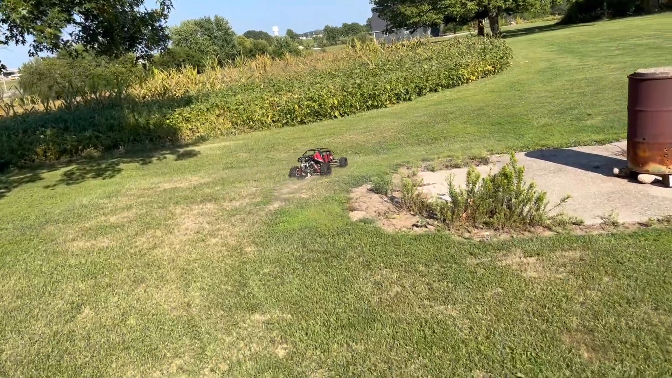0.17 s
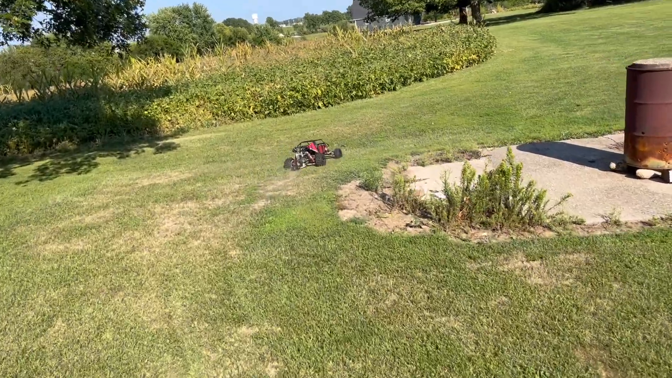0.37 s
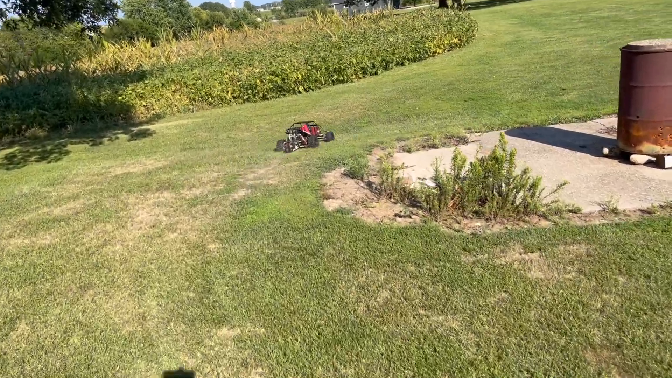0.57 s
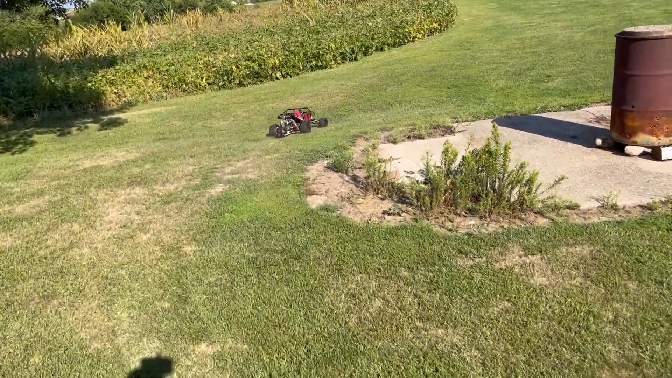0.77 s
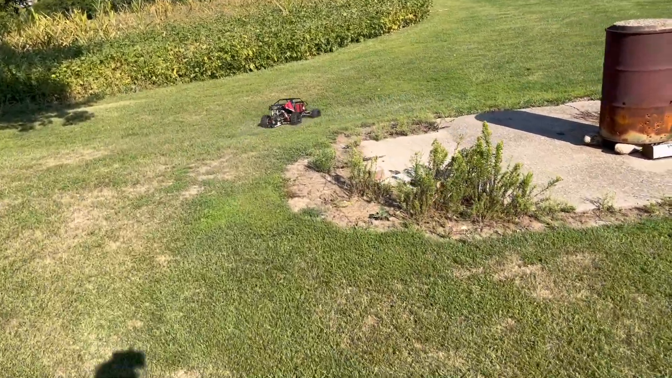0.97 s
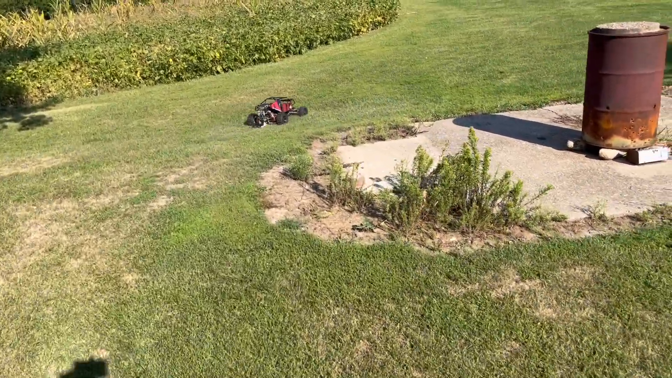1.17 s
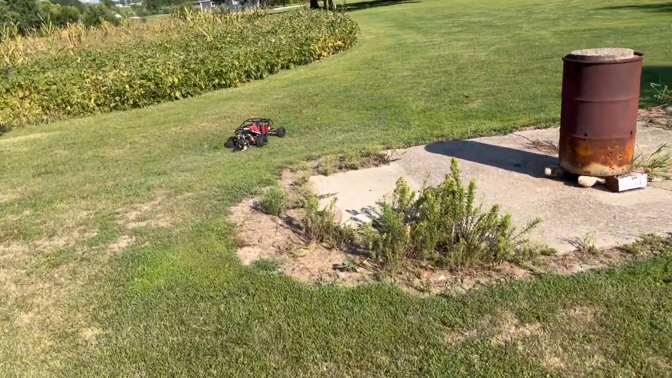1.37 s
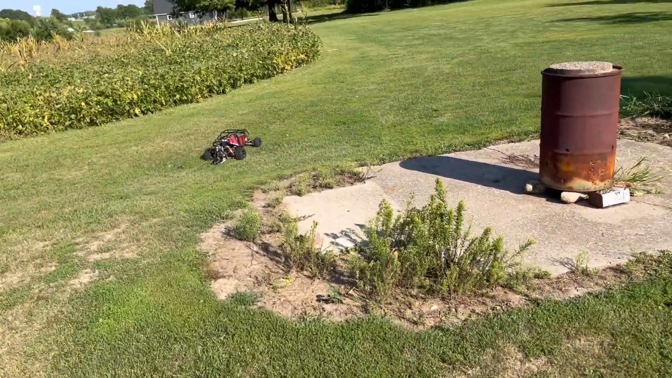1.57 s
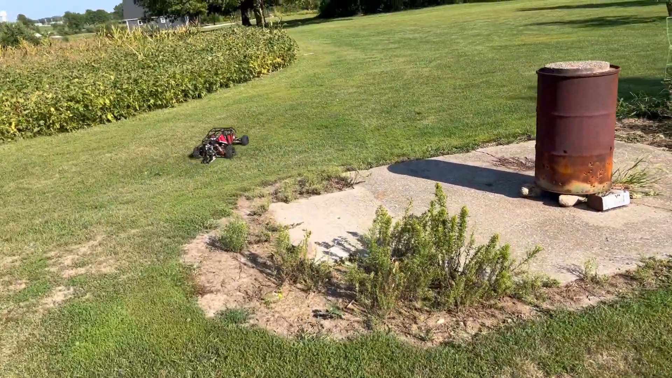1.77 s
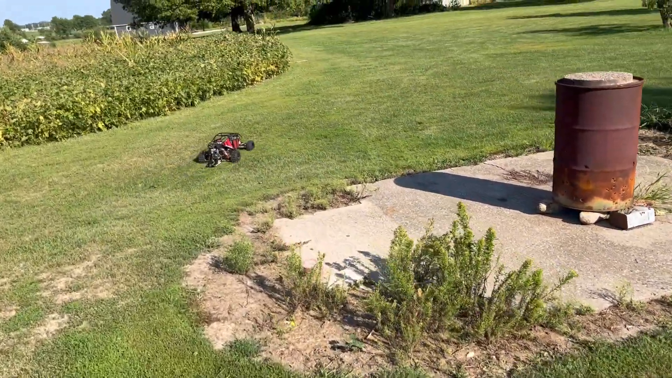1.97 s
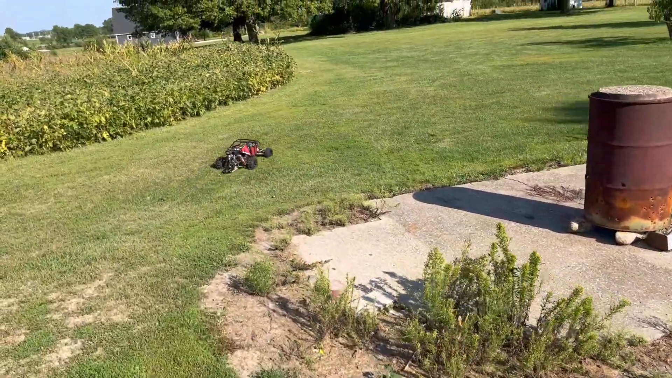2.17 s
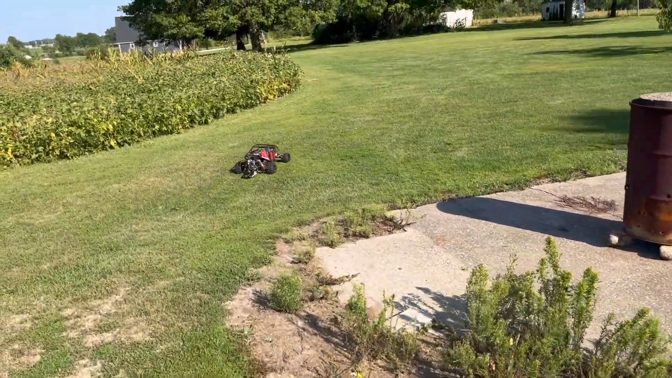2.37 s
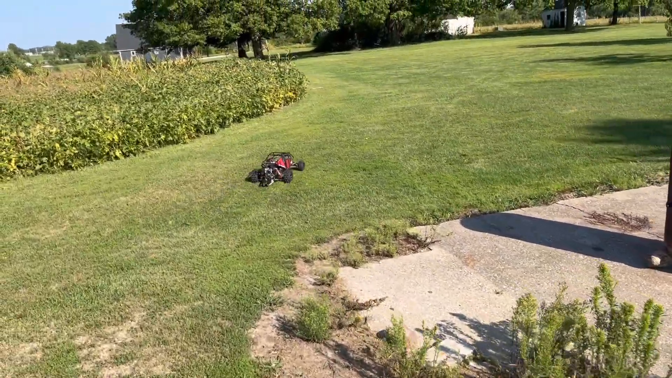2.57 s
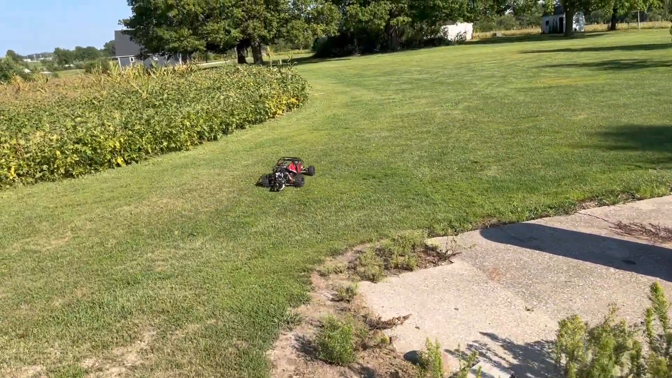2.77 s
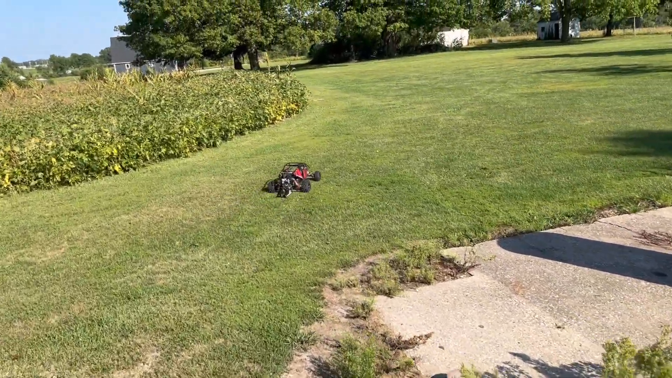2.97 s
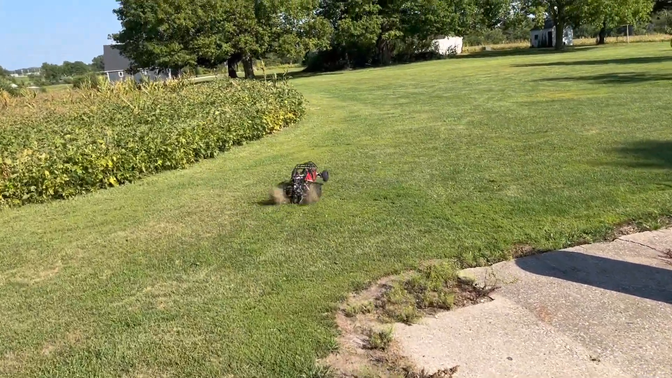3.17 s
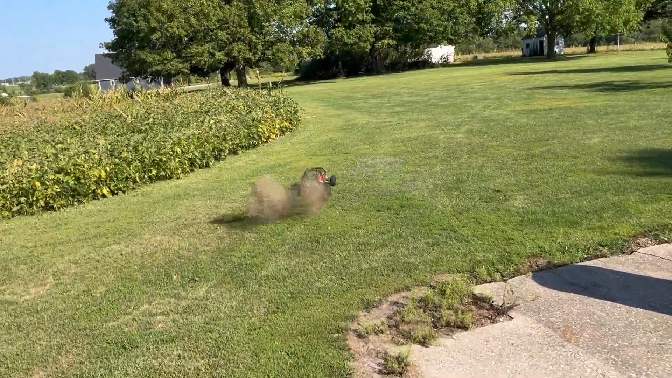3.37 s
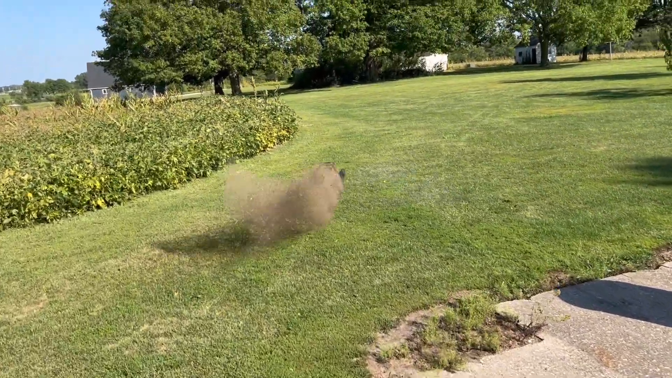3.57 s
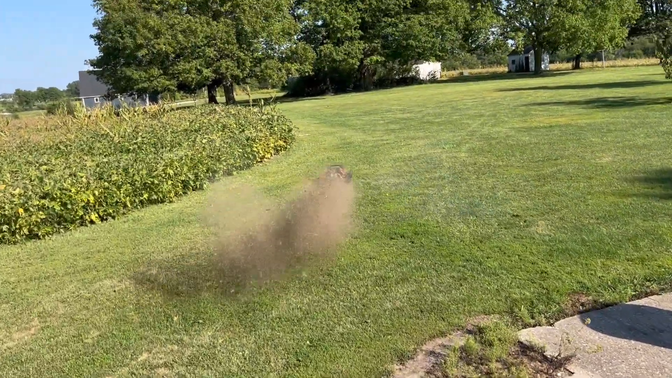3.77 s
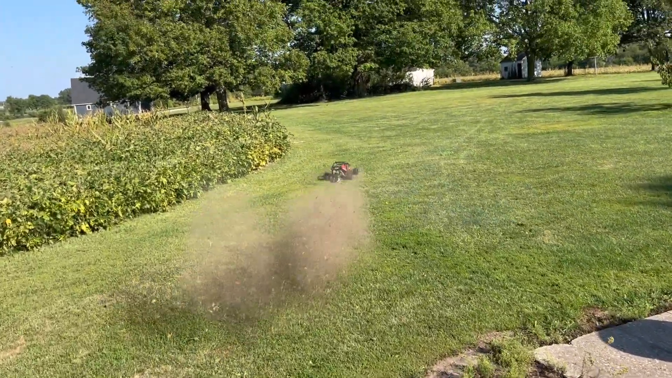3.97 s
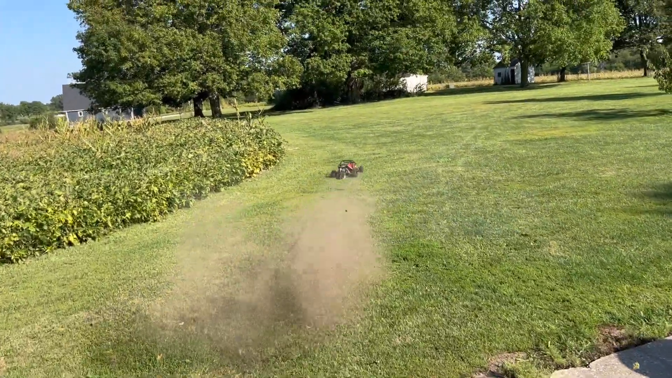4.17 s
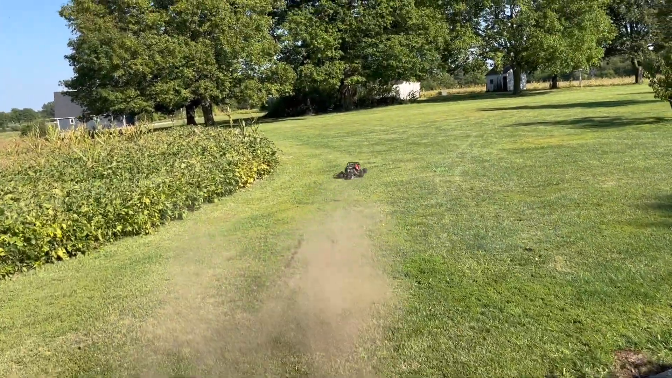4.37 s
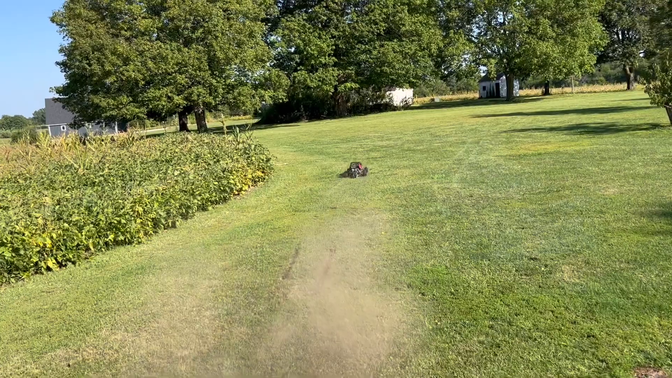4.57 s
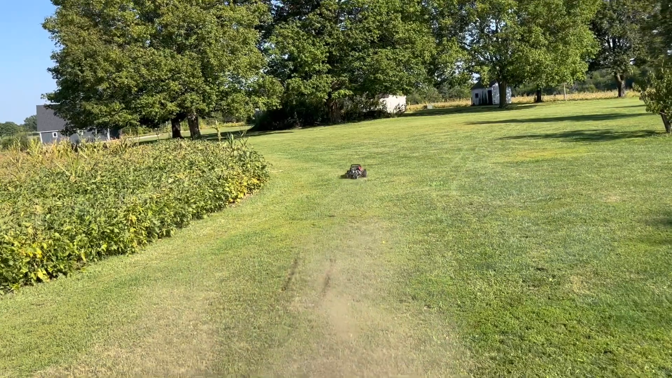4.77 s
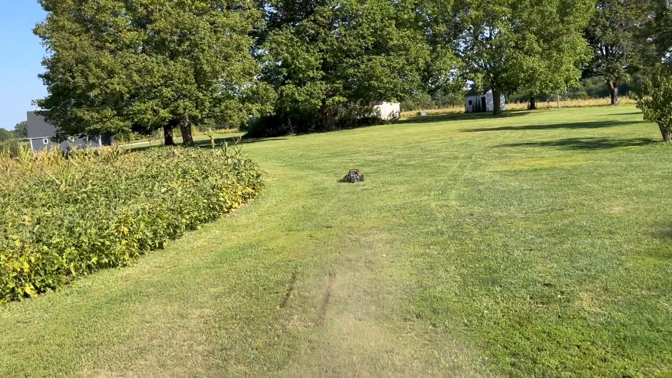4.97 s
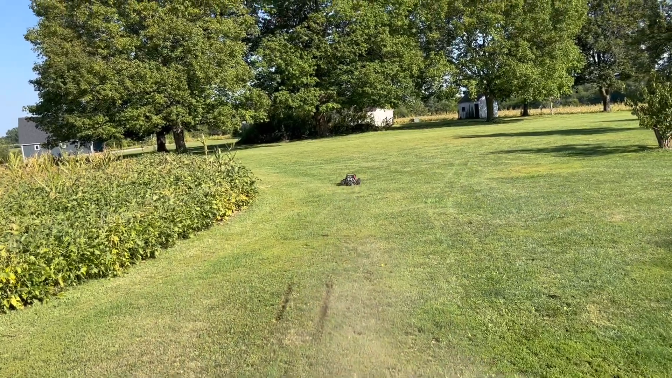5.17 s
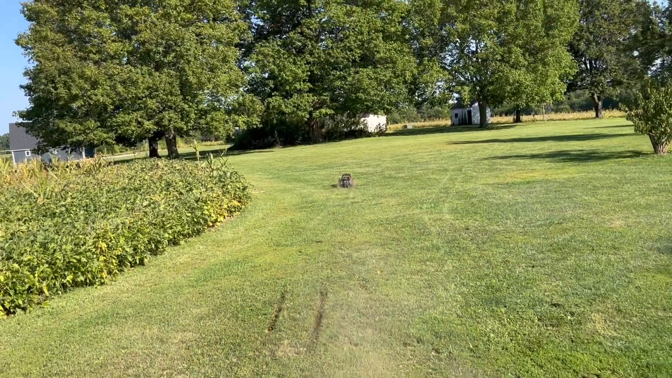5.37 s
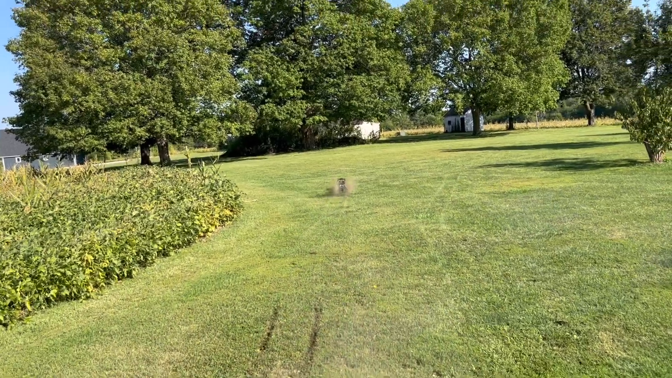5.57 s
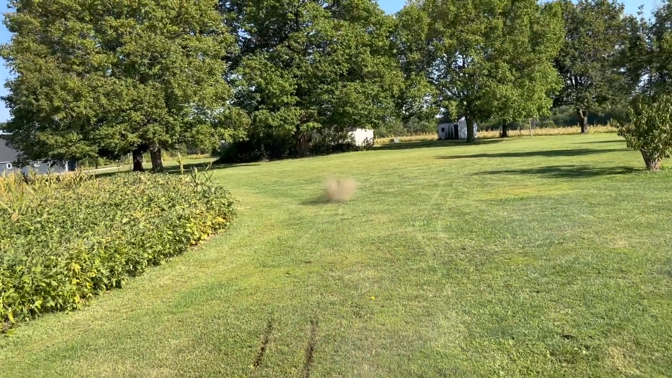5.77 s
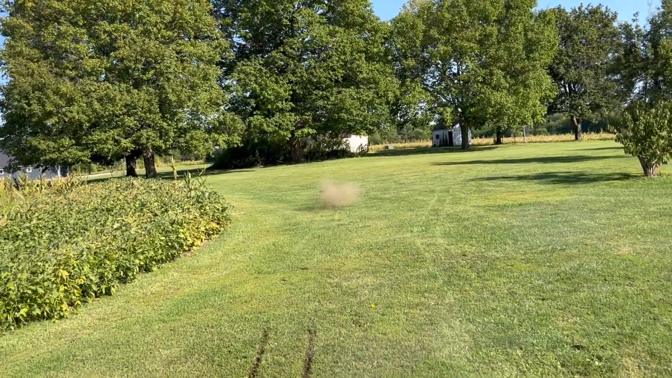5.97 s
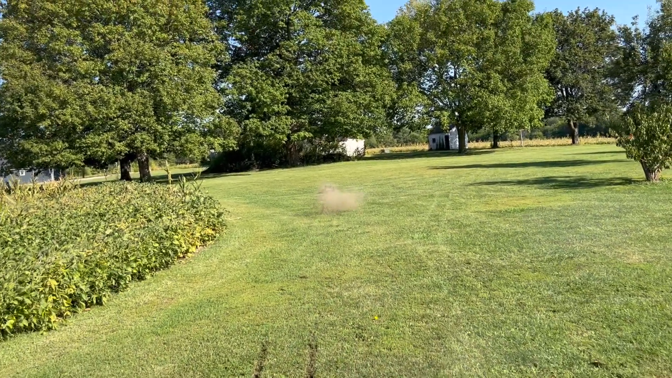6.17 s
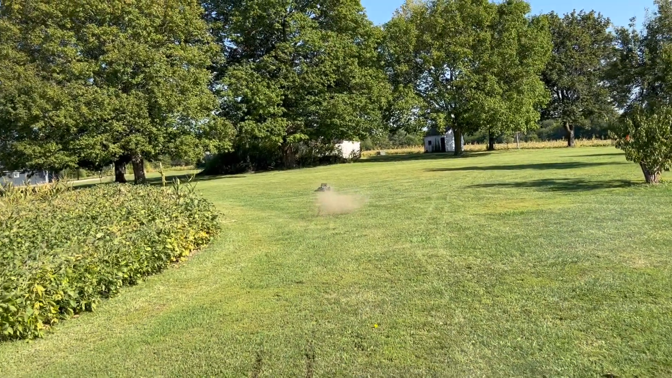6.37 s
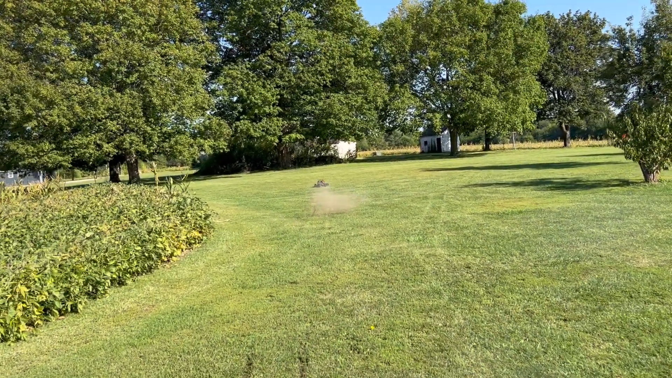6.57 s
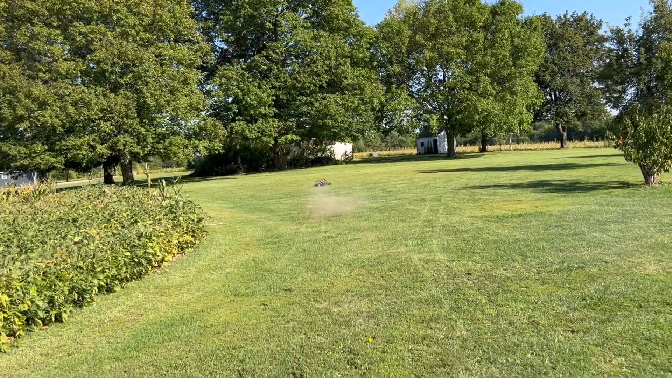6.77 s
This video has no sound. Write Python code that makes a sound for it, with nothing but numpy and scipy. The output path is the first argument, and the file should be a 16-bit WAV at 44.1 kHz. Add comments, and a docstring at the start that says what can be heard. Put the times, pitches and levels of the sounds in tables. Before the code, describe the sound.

Outdoors on an open lawn, a small two-stroke model buggy gives five sharp, uneven throttle blips, each falling back into rattling, popping coasting. It then tears off in a loud ragged burst with wheels slipping, coasts down, blips briefly and bursts again farther off, finally sputtering lower. Trees and crops return dull echoes. A handheld stereo microphone stays put, with faint wind, leaves and insects beneath.

```python
"""A small two-stroke model buggy on a lawn: light wind, leaves and insects lie under the whole scene.
Five short throttle blips come first, heard mostly side-on: each firing is a crack, a gas puff and a low thump.
At 2.9 s it spins its wheels away in a long burst, tail-on; a short blip at 4.7 s leads to a second at 5.2 s.
Whenever the throttle shuts, drag slows the crank: the engine pumps air and rattles, with stray firings.
Trees and crops answer as scattered, duller echoes, and it winds down to the end."""
import sys
import numpy as np
from scipy import signal
from scipy.fft import rfft, irfft, next_fast_len
from scipy.io import wavfile
from scipy.ndimage import uniform_filter1d, map_coordinates

SR = 44100
rng = np.random.default_rng(int(sys.argv[2]) if len(sys.argv) > 2 else 0)


def waveform_to_disk(signal):
    """Save audio, clipped to [-1, 1], as 16-bit WAV at the path in sys.argv[1]."""
    frames = np.transpose(np.atleast_2d(signal))
    scaled = np.clip(frames, -1, 1) * 32767
    samples = np.round(scaled).astype(np.int16)
    wavfile.write(sys.argv[1], SR, samples)


N = 301196

# waves running back along the tuned pipe: (delay/s, level/dB)
PIPE_WAVES = [(.0012, -10), (.0024, -13), (.0035, -15), (.0085, -21)]
RATTLE_DB_PER_OCTAVE = 19.5  # growth with crank speed
FLUTTER_DB, FLUTTER_RATE = 2.5, 12  # throttle shut, cracks and rattle swell and sink: depth, changes a second
LEAD_S, EARLY_S = .02, .012  # the crank picks up before steady firing and tops out before the end


def amp(db):
    """Decibels to amplitude."""
    return 10 ** (np.asarray(db) / 20)


def unit(x):
    """Scales to an RMS of one."""
    return x / np.sqrt(np.mean(x ** 2) + 1e-20)


def along(points, hz):
    """Reads (f/Hz, value) points on a log frequency axis."""
    f, v = np.transpose(points)
    return np.interp(np.log(hz + 1), np.log(f + 1), v)


def curves(rows, t):
    """Each column after the time, read at times t."""
    s, *cols = np.transpose(rows)
    return [np.interp(t, s, c) for c in cols]


def wobble(rate):
    """A smooth random curve, rate knots a second."""
    knots = rng.standard_normal(int(N * rate / SR) + 4)
    return map_coordinates(knots, [np.arange(N) * rate / SR])


def filtered(x, response):
    """Applies a complex response of frequency to x."""
    m = next_fast_len(N + SR // 2)
    return irfft(rfft(x, m) * response(np.fft.rfftfreq(m, 1 / SR)), m)[..., :N]


def coloured(x, spectrum):
    """Minimum-phase colouring that keeps the energy of a pulse or of white noise."""
    size = 4096
    gain_db = np.maximum(along(spectrum, np.fft.rfftfreq(size, 1 / SR)), -70)
    # fold the cepstrum forward in time, so nothing sounds ahead of its pulse
    cepstrum = irfft(np.log(amp(gain_db)))
    cepstrum[1:size // 2] *= 2
    cepstrum[size // 2 + 1:] = 0
    shape = irfft(np.exp(rfft(cepstrum)))
    shape = shape[None] / np.linalg.norm(shape)
    return signal.fftconvolve(np.atleast_2d(x), shape, axes=1)[:, :N]


def pulses(times, sizes):
    """Windowed-sinc pulses that may fall between samples."""
    at = np.asarray(times)[:, None] * SR
    k = np.floor(at) + np.arange(-7, 9)
    w = np.sinc(k - at) * np.cos(np.pi * (k - at) / 16) ** 2
    slots = np.clip(k, 0, N).astype(int).ravel()
    return np.bincount(slots, (w * sizes[:, None]).ravel(), N + 1)[:N]


def ring(x, centre_hz, width_hz, db):
    """Lifts or cuts one resonance."""
    def response(f):
        band = 1j * f * width_hz
        return 1 + (amp(db) - 1) * band / (centre_hz ** 2 - f * f + band)
    return filtered(x, response)


def sliding(x, centre_hz, width_hz, db, count=9):
    """A resonance that moves: each moment is shared between the two nearest of a row of fixed ones."""
    row = np.linspace(centre_hz.min(), centre_hz.max(), count)
    place = np.interp(centre_hz, row, np.arange(count))
    share = lambda k: np.clip(1 - np.abs(place - k), 0, 1)
    return sum(ring(x * share(k), c, width_hz, db) for k, c in enumerate(row))


def openings():
    """Throttle openings: first and last firing s, rows (t/s, crank/Hz, crack/dB, thump/dB), facing, rattle dB, pumping dB."""
    # short throttle blips: (open t/s, shut t/s, crank at opening f/Hz, crank at top f/Hz, first crack level/dB,
    # last crack level/dB, thump level/dB, pipe facing the listener/0-1, coasting rattle level/dB, pumping level/dB)
    blips = [ (0.028, 0.123, 97.34, 170.2, -26, -25, -26.5, 0.04, -56.5, -39),
             (0.471, 0.564, 97.18, 193.3, -24.5, -25, -25, 0.09, -60, -40),
             (1.124, 1.192, 75.08, 144.9, -30.5, -28, -27, 0.1, -56.5, -38),
             (1.626, 1.744, 87.17, 178.6, -21, -20.5, -25, 0.08, -53.5, -39.5),
             (2.35, 2.459, 73.72, 168.8, -22, -21, -26.5, 0.21, -52.5, -40),
             (4.68, 4.783, 37.98, 156.6, -41.5, -27, -35.5, 0.98, -57.5, -48), ]
    # long bursts, wheels slipping and gripping: (t/s, crank f/Hz, crack level/dB, thump level/dB)
    bursts = [
        [(2.902, 87.3, -23, -31.5), (2.982, 165.7, -21.5, -28.5), (3.034, 202, -20, -30),
         (3.078, 210.4, -19, -30.5), (3.162, 206.8, -19.5, -31.5), (3.238, 191.7, -21.5, -35),
         (3.272, 220.9, -19, -30.5), (3.298, 235.6, -22, -35), (3.326, 229.4, -21.5, -30.5),
         (3.358, 205.2, -21.5, -35), (3.386, 194.3, -21.5, -31.5), (3.436, 208.4, -21, -32),
         (3.466, 189.5, -22, -33.5), (3.548, 188.1, -27, -34.5)],
        [(5.165, 90.9, -34.5, -40.5), (5.246, 163.5, -24, -34.5), (5.328, 198, -24.5, -34),
         (5.368, 200.7, -21, -34), (5.474, 191, -24, -36), (5.532, 230.7, -22.5, -33.5),
         (5.604, 226, -23, -34.5), (5.644, 204.3, -23.5, -36), (5.68, 198.4, -25, -36.5),
         (5.716, 199.2, -22.5, -35.5), (5.782, 219.3, -24.5, -37)],
    ]
    # coasting after each burst: (rattle level/dB, pumping level/dB)
    burst_ends = [(-66, -50.5), (-58, -52.5)]
    bend, thump_swell = .9, .91  # curve of the rise in speed; the thump's share of the crack's swell
    out = [(b[0][0] + LEAD_S, b[-1][0] + EARLY_S, np.array(b), 1, *end) for b, end in zip(bursts, burst_ends)]
    u = np.linspace(0, 1, 12)
    for start, shut, low_hz, top_hz, first_db, last_db, thump_db, *end in blips:
        s = start - LEAD_S + u * (shut - EARLY_S - start + LEAD_S)
        hz = low_hz + (top_hz - low_hz) * u ** bend
        swell_db = (first_db - last_db) * (1 - u)
        rows = [s, hz, last_db + swell_db, thump_db + thump_swell * swell_db]
        out.append((start, shut, np.transpose(rows), *end))
    return sorted(out, key=lambda o: o[0])


def speed():
    """Crank turns a second: driven while open, then slowed by drag down to the speed of the next opening."""
    # throttle shut: (crank f/Hz, loss of speed/turns per s each s)
    drag = [(35, 18), (45, 47), (70, 105), (100, 135), (145, 290), (180, 800), (240, 1300)]
    last_hz = 37.84  # as the scene ends
    hz = np.linspace(250, 30, 221)
    lapse = np.cumsum(1 / along(drag, hz))  # relative time taken to slow down this far
    driven = [o[2][:, :2] for o in openings()] + [np.array([[N / SR, last_hz]])]
    u = np.linspace(0, 1, 60)[1:-1]
    rows = []
    for now, then in zip(driven, driven[1:]):
        a, b = np.interp([-now[-1, 1], -then[0, 1]], -hz, lapse)
        coast_s = now[-1, 0] + u * (then[0, 0] - now[-1, 0])
        coast_hz = np.interp(a + u * (b - a), lapse, hz)
        rows += [now, np.transpose([coast_s, coast_hz])]
    path = np.vstack(rows + driven[-1:])
    return uniform_filter1d(curves(path, np.arange(N) / SR)[0], size=1000)  # the flywheel rounds the corners


def crank(hz):
    """Crank angle in turns; the first firing of an opening falls on a whole turn."""
    t = np.arange(N) / SR
    turns = np.cumsum(hz) / SR
    starts = [o[0] for o in openings()]
    at = np.interp(starts, t, turns)
    return turns + np.interp(t, starts, np.round(at) - at + 1e-6)


def coasting(column):
    """An openings() column over time: reached while an opening fires, then held until the next one."""
    each = openings()
    value = np.repeat([o[column] for o in each], 2)
    return np.interp(np.arange(N) / SR, np.ravel([o[:2] for o in each]), np.r_[value[0], value[:-1]])


def coasting_rattle_db(hz):
    """Coasting rattle level: it grows with crank speed and flutters."""
    return coasting(column=4) + RATTLE_DB_PER_OCTAVE * np.log2(hz / 100) + FLUTTER_DB * wobble(FLUTTER_RATE)


def outdoors():
    """Far rustle of leaves, thin insect songs and wind lumps on the ports, all from shaped noise."""
    # leaf rustle: (f/Hz, level/dB)
    field = [(350, -34.5), (600, 5.5), (863, -5.5), (1180, -5.5), (4590, -15), (8520, -23.5), (10600, -23),
             (14500, -37), (16000, -68)]
    # insect songs: (f/Hz, width/Hz, level before swelling/dB)
    insects = [(9150, 130, -80), (10400, 160, -80), (11600, 150, -86)]
    # colour of the wind lumps: (f/Hz, level/dB)
    buffet = [(20, -30), (40, -4), (60, 0), (100, -5), (160, -18), (300, -45)]
    # strength of the wind lumps: (t/s, level/dB)
    wind = [(0, -30.5), (.3, -72), (1, -46), (1.8, -41), (2.5, -43.5), (3.48, -43.5), (4.03, -65.5),
            (4.2, -53), (6.1, -66), (6.3, -52.5)]
    field_db, gust_db = -58, 2

    def pair(apart):  # shared noise plus some of each port's own
        return rng.standard_normal(N) + apart * rng.standard_normal((2, N))

    def song(centre_hz, width_hz):
        return unit(filtered(pair(1.0), lambda f: np.exp(-((f - centre_hz) / width_hz) ** 2)))

    leaves = amp(field_db + gust_db * wobble(3.035)) * coloured(pair(0.54), field)
    bugs = sum(amp(db + 6 * wobble(3)) * song(c, w) for c, w, db in insects)
    lumps = unit(amp(3 * wobble(12)) * coloured(pair(.2), buffet))
    return leaves + bugs + amp(curves(wind, np.arange(N) / SR)[0]) * lumps


def pumping(turns, hz):
    """With no firing the port still puffs once a turn; the faster the crank, the sharper the puff."""
    # colour of the sharp puff: (f/Hz, level/dB)
    sharp_spectrum = [(35, -111), (70, 27), (130, 21), (270, 19), (550, 16.5), (680, 28), (790, 10),
                      (910, 27.5), (1200, -8), (1600, 14.5), (2800, 22), (4000, -17)]
    # colour of the soft puff near idle: (f/Hz, level/dB)
    soft_spectrum = [(40, -36), (90, -18), (160, 4.5), (300, 3), (480, 2.5), (900, -21), (1500, -22)]
    # pumping gain: (crank f/Hz, level/dB)
    gain_by_speed = [(40, -2), (65, -1.5), (95, 2), (150, 4.5)]
    # crank speeds between which the puff turns soft: (still sharp f/Hz, all soft f/Hz)
    sharp_hz, soft_hz = (78.6, 50)
    slump_s, slump_hz = .012, 250  # the soft puff falls in pitch: lag of its lowest part, scale of the shrinking lag
    t = np.arange(N) / SR
    # a pulse train whose order k weighs r ** k
    r = np.clip(0.768 + 0.0021 * hz, 0, .96)
    train = (1 - r * r) / (1 - 2 * r * np.cos(2 * np.pi * turns) + r * r)
    puffs = (train - 1) * np.sqrt(1 - r * r)
    shut = 1 - sum((t > o[0]) & (t < o[1]) for o in openings())
    level = amp(coasting(column=5) + along(gain_by_speed, hz))
    soft = np.clip((hz - sharp_hz) / (soft_hz - sharp_hz), 0, 1)
    uneven = amp(4 * wobble(45))
    breathy = puffs * uneven + rng.standard_normal(N)  # half lost in turbulent gas
    slump = lambda f: np.exp(-2j * np.pi * slump_s * slump_hz * (1 - np.exp(-f / slump_hz)))
    putts = filtered(coloured(breathy, soft_spectrum), slump)
    puffed = unit(coloured(puffs, sharp_spectrum)) * np.sqrt(1 - soft) + unit(putts) * np.sqrt(soft)
    return level * uniform_filter1d(shut * 1., size=200) * puffed


def rattle(turns, hz):
    """Clutch, gears and intake: spiky noise that swells once a turn, shaken harder by firing."""
    # rattle colour: (f/Hz, level/dB)
    spectrum = [(300, -21), (800, -0.5), (1700, -10.5), (3800, 3.5), (5400, -27), (10000, -18),
                (14000, -29), (16500, -79)]
    gate, spike_db = 0.067, 5  # depth of the swell; spikiness of the grains
    offset_db = -10  # against the coasting rattle level
    shake_db, shake_t60_s = -14, .35  # firing shakes the parts up to this against the crack, then they settle
    hidden_db = -5  # tail-on, the body hides the shaking parts
    t = np.arange(N) / SR
    swell = 1 + gate * np.cos(2 * np.pi * turns)
    grains = rng.standard_normal(N) * amp(spike_db * wobble(1500)) * swell * amp(0.88 * wobble(5.4))
    level = amp(offset_db + coasting_rattle_db(hz))
    for start, shut, rows, facing, *_ in openings():
        settle_db = -60 * np.maximum(t - shut, 0) / shake_t60_s
        build = np.clip((t - start) / (shut - start), 0, 1)
        level += amp(rows[-1, 2] + shake_db + hidden_db * facing + settle_db) * build
    return level * coloured(unit(grains), spectrum)


def firings(turns, hz):
    """One firing a turn: full cracks and thumps while open, faint cracks while shut."""
    weak_db, weak_scatter_db = 4.5, 1.5  # faint cracks, against the coasting rattle level
    fade_hz, fade_db = 85, 14  # they fade under this speed, by this much an octave
    cut_s, cut_db = .021, -3  # the thump sinks over the last turns
    scatter_db, uneven_db = -0.67, 1.8  # size scatter tail-on; added side-on, where the blips fire unevenly
    misfire_s = 1.732  # one turn fails to light
    t = np.arange(N) / SR
    when = np.interp(np.arange(np.ceil(turns[0]), turns[-1]), turns, t)
    chance = rng.standard_normal((len(when), 2))
    hz_then = np.interp(when, t, hz)
    size = np.sqrt(SR / hz_then)  # a pulse carries one turn's energy
    crack = amp(np.interp(when, t, coasting_rattle_db(hz)) + weak_db + weak_scatter_db * chance[:, 1])
    crack *= amp(fade_db * np.minimum(np.log2(hz_then / fade_hz), 0))
    rear = np.interp(when, t, np.clip(coasting(column=3), 0, 1))
    thump, shut_db = np.zeros(len(when)), np.zeros(len(when))
    for start, shut, rows, facing, *_ in openings():
        on = (when > start - .001) & (when < shut)
        _, crack_db, thump_db = curves(rows, when[on])
        thump_db += cut_db * np.clip(1 - (shut - when[on]) / cut_s, 0, 1)
        crack[on], thump[on], rear[on] = amp(crack_db), amp(thump_db), np.clip(facing, 0, 1)
        shut_db[on] = -np.inf
    crack *= amp((scatter_db + uneven_db * (1 - rear)) * chance[:, 0])
    crack[np.argmin(np.abs(when - misfire_s))] = 0
    return when, size, crack, thump, rear, shut_db


def stray_firings():
    """Single stray firings: times, sizes and how far each is heard tail-on."""
    # stray firings: (t/s, level/dB)
    pops = [(0.0062, 0), (0.4458, -1), (0.4543, 1.5), (0.463, -6), (1.062, -14), (1.0887, -3.5),
            (1.113, -2.5), (1.6053, 5.5), (2.2095, -16), (2.234, -9.5), (2.26, -4), (2.316, -4), (2.327, 5),
            (2.8878, -8.5), (2.9015, 3.5), (2.913, -1.5), (4.2001, -18), (4.3253, -16.5), (4.447, -39),
            (4.4709, -31), (4.6124, -47), (4.6398, -42), (4.519, -56), (4.5432, -21.5), (4.663, -17),
            (5.1637, -7.5), (6.4678, -23), (6.518, -34), (6.552, -29.5), (6.634, -24), (6.7211, -34.5),
            (6.771, -21)]
    pop_s, pop_db = np.transpose(pops)
    pop_s = pop_s + .0007  # the crack peaks just after the port opens
    behind = np.clip(pop_s - 3, 0, 1)  # the buggy turns its tail from 3 to 4 s
    return pop_s, amp(pop_db), behind


def piped(times, sizes, drifts):
    """Pulses, each followed by the waves that run back along the pipe."""
    t = np.arange(N) / SR
    out = pulses(times, sizes)
    for (delay_s, db), drift in zip(PIPE_WAVES, drifts):
        out = out + pulses(times + delay_s * (1 + np.interp(times, t, drift)), sizes * amp(db))
    return out


def clicks(times, sizes, turn_s, shut_db, drifts):
    """Piped cracks; throttle shut, further clicks follow in each turn."""
    # further clicks: (delay/share of a turn, level/dB)
    twins = [(.15, -2), (.6, -1)]
    extra = [pulses(times + share * turn_s, sizes * amp(db + shut_db)) for share, db in twins]
    return piped(times, sizes, drifts) + sum(extra)


def turbulence(x, decay_s, count):
    """Gas noise that bursts with each pulse of x and dies away."""
    decay = np.exp(-np.arange(SR // 20) / SR / decay_s) * np.sqrt(2 / decay_s / SR)
    return rng.standard_normal((count, N)) * signal.fftconvolve(np.abs(x), decay)[:N]


def gas(x):
    """Pulses with a small share of turbulent gas."""
    return x + .04 * turbulence(x, decay_s=.005, count=1)


def side_on(side, hz):
    """Side-on resonances: a fixed set until the buggy swings round, and one riding on the crank speed."""
    # stressed or lost before the swing: (f/Hz, width/Hz, level/dB)
    flank_tones = [(1350, 600, 9), (2700, 1400, -6), (5900, 2400, 11)]
    # the swing round: (start t/s, end t/s)
    swing = (1.3, 1.6)
    order, order_width_hz, order_db = 13, 350, 9  # multiple of the crank speed
    swung = np.interp(np.arange(N) / SR, swing, [0, 1])
    early = side * (1 - swung)
    for tone in flank_tones:
        early = ring(early, *tone)
    return sliding(early + side * swung, np.maximum(order * hz, 1300), order_width_hz, order_db)


def front(f):
    """A steep front with highs leading, and a short scatter off body and grass."""
    turn_rad, spread_s = 1.9, 0.000487  # phase turn: the crack swings both ways about equally; lag of the lows
    steep = np.exp(1j * turn_rad - 2j * np.pi * spread_s * 8000 * np.log(1 + f / 8000))
    t = np.arange(SR // 40) / SR
    near = rng.standard_normal((2, len(t))) * np.exp(-t / .0025)  # different at each port
    return steep * (1 + .22 * rfft(near / np.linalg.norm(near[0]), 2 * len(f) - 2))


def exhaust(turns, hz):
    """Each firing is a crack with a puff of turbulent gas, a hissing jet and, if lit, a low thump."""
    # crack side-on: (f/Hz, level/dB)
    side_spectrum = [(300, -44), (800, 21.5), (1200, 7.5), (1600, 11), (2200, 18.5), (2900, 26.5),
                     (3600, 13), (4500, 0), (5400, 13), (6800, 8.5), (8500, 10.5), (11000, 8), (14000, 6),
                     (16500, -108)]
    # crack tail-on: (f/Hz, level/dB)
    rear_spectrum = [(1000, -28), (1450, -6.5), (1680, -0.5), (2050, 12), (2600, -3.5), (3000, 8.5),
                     (3750, 5), (4200, -0.5), (4650, 8), (5300, -3), (6200, 1), (7800, 1), (10000, -0.5),
                     (14000, -17)]
    # tail-on crack as the reflectors get it, and as heard with the throttle shut: (f/Hz, level/dB)
    thrown_spectrum = [(500, -10), (1200, -11.5), (1800, -0.5), (4500, -1.5), (8000, -16), (16000, -12.5)]
    # stray firing tail-on: (f/Hz, level/dB)
    pop_spectrum = [(500, 0.5), (900, 6), (1330, -4.5), (2140, 5), (3800, 8.5), (6400, -4), (7900, -3),
                    (11900, -15), (16500, -27)]
    # thump: (f/Hz, level/dB)
    thump_spectrum = [(60, -29), (120, 28.5), (200, 37.5), (300, 24.5), (450, 40), (650, 34), (850, 38),
                      (1050, 21.5), (1400, 15.5), (2000, -16.5)]
    # gas jet: (f/Hz, level/dB)
    jet_spectrum = [(1500, -4), (3500, 0), (11000, -6.5), (14000, -5.5), (16500, -61.5)]
    # tail-on the thump sings higher up: (f/Hz, width/Hz, level/dB)
    bark = (1330, 380, 17)
    # tail-on ring, wandering as the buggy slews: (t/s, f/Hz)
    ring_path = [(2.92, 4146), (3.03, 4480), (3.1, 4100), (3.28, 3930), (3.32, 4082), (3.36, 3600),
                 (3.43, 3650), (3.5, 4410), (3.56, 3457), (4.7, 4050), (5.18, 4422), (5.29, 4570),
                 (5.36, 3930), (5.43, 3970), (5.5, 3300), (5.58, 3800), (5.65, 3338), (5.7, 3820),
                 (5.8, 3686)]
    ring_width_hz, ring_db = 600, 10
    jitter_s, weak_jitter_s = .00001, .00002  # timing scatter of each crack; added with the throttle shut
    drift_share, drift_rate = .05, 7  # pipe delays wander with gas heat and heading: share, changes a second
    jet_rear_db, jet_side_db, jet_s = -21, -24, .004  # hiss against the crack; decay after each firing
    lit_margin_s = .021
    t = np.arange(N) / SR
    when, size, crack, thump, rear, shut_db = firings(turns, hz)
    pop_s, pop, behind = stray_firings()
    drifts = [drift_share * wobble(drift_rate) for _ in PIPE_WAVES]
    cracked = when + (jitter_s + weak_jitter_s * amp(shut_db)) * rng.standard_normal(len(when))
    turn_s = size ** 2 / SR

    side = clicks(cracked, size * crack * np.sqrt(1 - rear), turn_s, shut_db, drifts)
    side = side_on(side + piped(pop_s, pop * (1 - behind), drifts), hz)
    back = clicks(cracked, size * crack * np.sqrt(rear), turn_s, shut_db, drifts)
    stray = piped(pop_s, pop * behind, drifts)
    lit = sum((t > o[0] - lit_margin_s) & (t < o[1] + lit_margin_s) for o in openings())
    tail = sliding(back * lit, *curves(ring_path, t), ring_width_hz, ring_db)

    flank = coloured(gas(side), side_spectrum)
    fired = flank + coloured(gas(back * (1 - lit)), thrown_spectrum)
    fired = fired + coloured(gas(tail), rear_spectrum) + coloured(2 * gas(stray), pop_spectrum)
    jet = turbulence(amp(jet_rear_db) * (back + stray) + amp(jet_side_db) * side, jet_s, count=3)
    jet = coloured(jet[0] + 0.4 * jet[1:], jet_spectrum)  # mostly shared by the two ports

    low = pulses(when, size * thump * (1 - rear))
    low = low + ring(pulses(when, size * thump * rear), *bark)
    low = low + pulses(pop_s, pop * amp(-8 + 6.4 * behind))  # stray firings thump harder tail-on
    thrown = flank + coloured(gas(2 * back + 2 * stray), thrown_spectrum)
    return filtered(fired, front) + jet, coloured(low, thump_spectrum), thrown


def echoes(x, walls, dull_hz=5000):
    """Scattered, duller answers, different at each port."""
    t = np.arange(SR * 2 // 3) / SR
    lumps = sum(amp(db) * np.exp(-((t - s) / w) ** 2) / np.sqrt(w * SR) for s, w, db in walls)
    shared, own = rng.standard_normal(len(t)), rng.standard_normal((2, len(t)))
    answer = .5 * lumps * (shared + own)
    for s, w, db in walls:
        answer[:, round(s * SR)] += amp(db) * (w < .005)  # a compact reflector also mirrors the sound whole
    wet = signal.fftconvolve(x, answer, axes=1)[:, :N]
    return filtered(wet, lambda f: 1 / (1 + 1j * f / dull_hz))


def scene():
    """Engine, its answers from the surroundings, and the outdoor bed."""
    # barrel, crop edge, field, trees, far trees: (delay/s, spread/s, level/dB)
    walls_near = [(.03, .03, -23), (.147, .002, -19), (.2, .12, -33), (.322, .0015, -20), (.57, .01, -25)]
    # once the buggy has run off down the lawn: (delay/s, spread/s, level/dB)
    walls_far = [(.05, .05, -24), (.2, .003, -18), (.25, .15, -34), (.385, .002, -24), (.62, .01, -30)]
    far_s = 5.1  # sound from here on gets the far answers
    t = np.arange(N) / SR
    hz = speed()
    turns = crank(hz)
    parts = rattle(turns, hz)
    cracks, thumps, thrown = exhaust(turns, hz)
    # turned away, the pipe throws less at the reflectors; foliage lets the low thumps pass
    sent = amp(np.interp(t, [2.9, 3.3], [0, -8])) * (thrown + parts)
    far = t > far_s
    answers = echoes(sent * ~far, walls_near) + echoes(sent * far, walls_far)
    return outdoors() + pumping(turns, hz) + parts + cracks + thumps + answers


def record(dry):
    """The two ports sit apart, so their phases part with frequency; peaks round off; a low cut and a band limit."""
    # phase between the ports: (f/Hz, lead of the left port/rad)
    port_lead = [(0, 0), (1550, -0.5), (2070, 0.1), (3790, 1.0), (5340, -1.0), (6550, -0.3), (7840, -2.9),
                 (9390, -3.5), (10800, -6.2), (12700, -6.2), (16500, -9.6)]
    top_hz, low_cut_hz = 16800, 40
    lead = lambda f: np.exp(.5j * np.array([[1], [-1]]) * along(port_lead, f))
    x = filtered(dry, lead)
    x = x / (1 + np.abs(x / .95) ** 6) ** (1 / 6)
    return filtered(x, lambda f: (f < top_hz) * f ** 4 / (f ** 4 + low_cut_hz ** 4))


dry = scene()
out = record(dry)
waveform_to_disk(out)
```